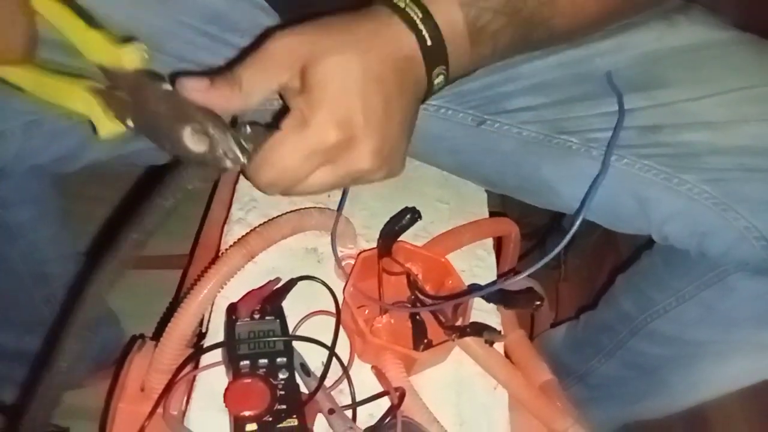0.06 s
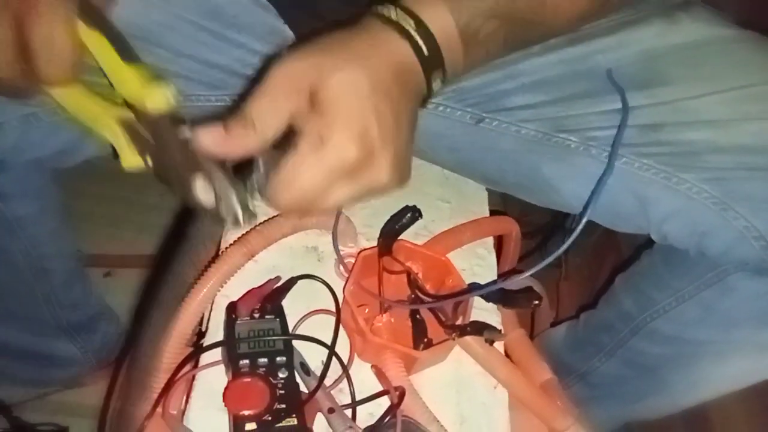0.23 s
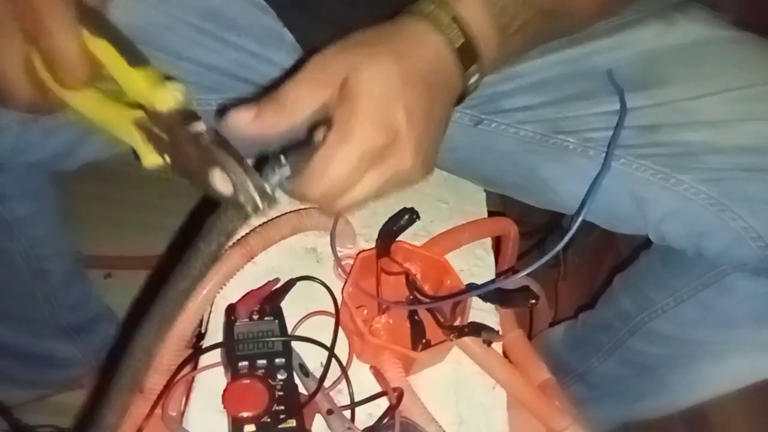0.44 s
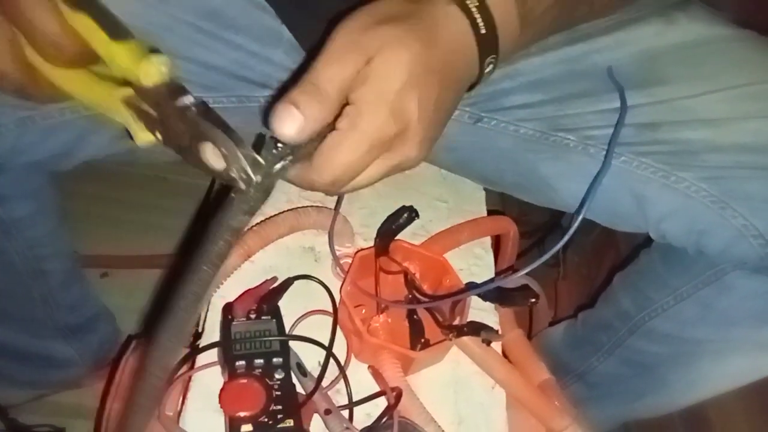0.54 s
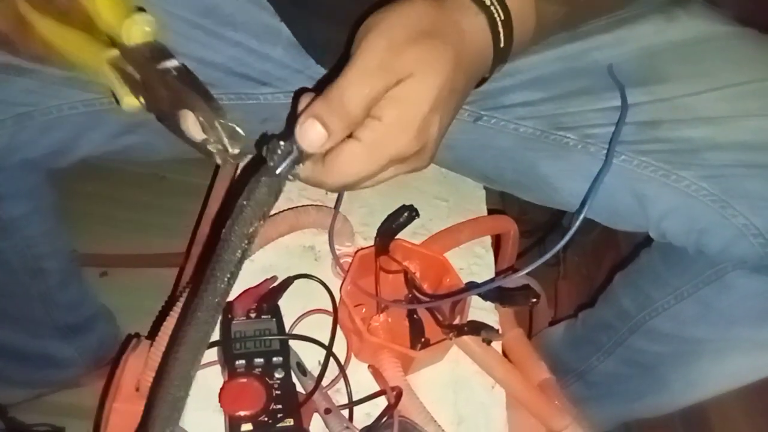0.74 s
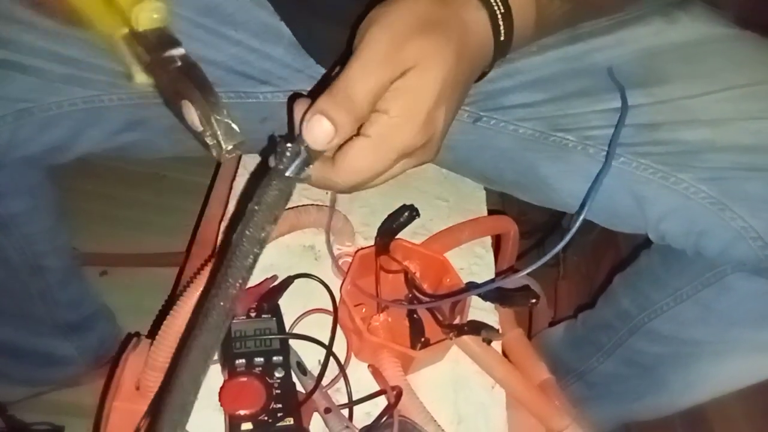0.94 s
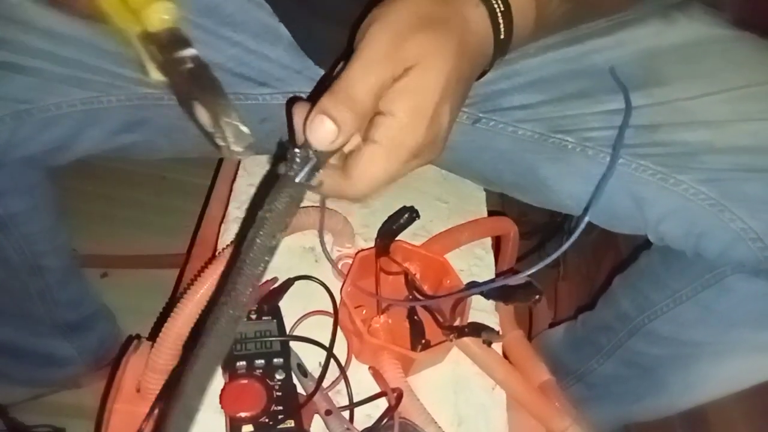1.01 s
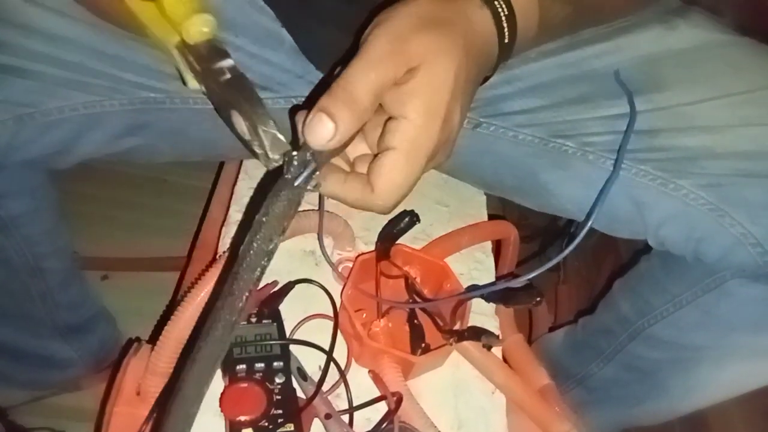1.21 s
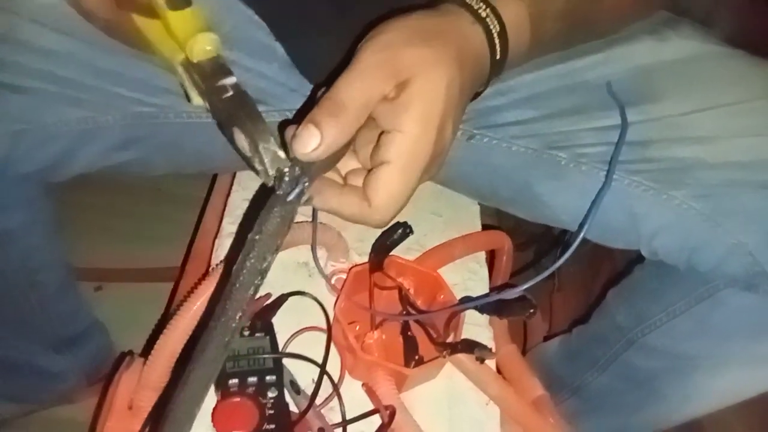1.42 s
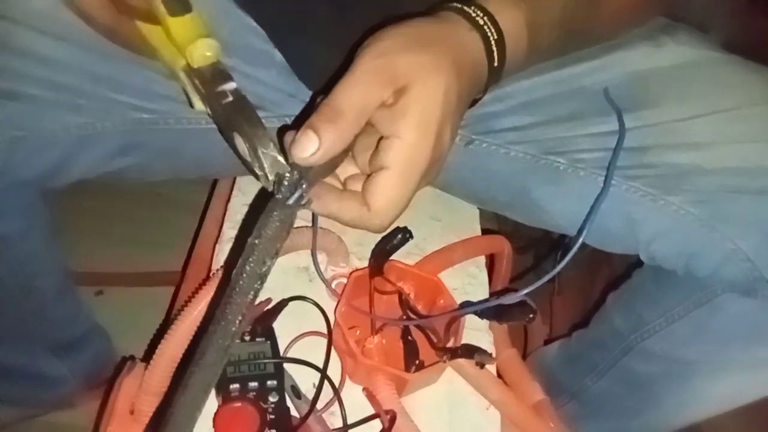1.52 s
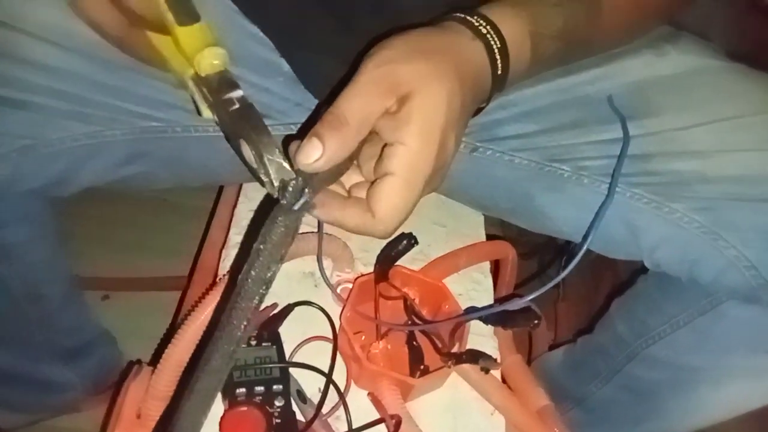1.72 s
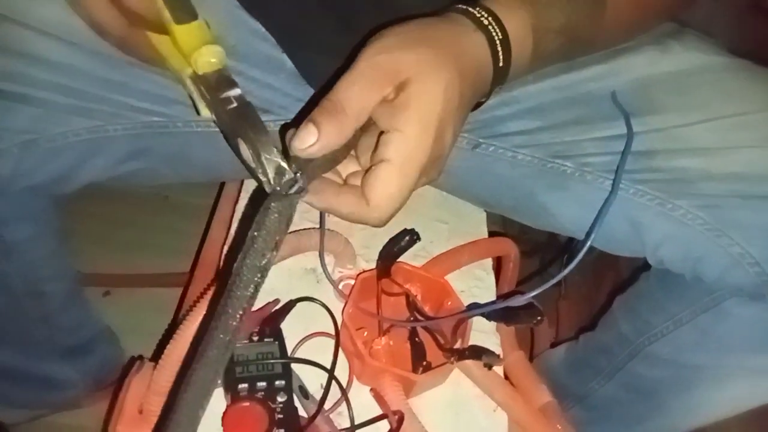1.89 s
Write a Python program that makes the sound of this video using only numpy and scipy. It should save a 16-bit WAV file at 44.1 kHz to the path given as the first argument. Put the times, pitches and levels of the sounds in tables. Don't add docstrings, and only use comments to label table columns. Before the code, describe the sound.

A single bright steel snap of pliers dominates early, echoing off nearby surfaces and hard walls; softer clicks, cable thuds and gritty rubbing trail after it, with faint low hum, heard close on a phone microphone.

```python
import sys
import numpy as np
from scipy import signal
from scipy.fft import rfft, irfft, next_fast_len
from scipy.io import wavfile
from scipy.ndimage import uniform_filter1d, map_coordinates

SR = 44100
rng = np.random.default_rng(int(sys.argv[2]) if len(sys.argv) > 2 else 0)


def invert_db(level):
    return 10 ** (np.asarray(level, dtype=float) / 20)


def pcm_store(signal):
    levels = np.round(np.clip(np.atleast_2d(signal), -1, 1) * 32767)
    wavfile.write(sys.argv[1], SR, levels.astype(np.int16).T)


N = 85995
SOUND_S = np.arange(N) / SR
BURST_S = np.arange(SR // 8) / SR


def unit(x):
    return x / np.sqrt(np.mean(x ** 2) + 1e-20)


def along(points, hz):
    f, v = np.transpose(points)
    return np.interp(np.log(hz + 1), np.log(f + 1), v)


def curve(rows):
    return np.interp(SOUND_S, *np.transpose(rows))


def wobble(knots_per_s):
    knots = rng.standard_normal(int(N * knots_per_s / SR) + 4)
    return map_coordinates(knots, [np.arange(N) * knots_per_s / SR])


def filtered(x, response):
    size = next_fast_len(len(x) + 8192)
    return irfft(rfft(x, size) * response(np.fft.rfftfreq(size, 1 / SR)), size)[:len(x)]


def body(peaks):
    def response(f):
        total = 0
        for k, (hz, width, db) in enumerate(peaks):
            total = total + (-1) ** k * invert_db(db) * 1j * f * width / (hz * hz - f * f + 1j * f * width)
        return total
    return response


def thrice(peak):
    near = body([peak])
    return lambda f: near(f) * near(f) * near(f)


def noise(spectrum):
    return unit(filtered(rng.standard_normal(N), lambda hz: invert_db(along(spectrum, hz))))


def add(track, start_s, sound):
    track[round(start_s * SR):][:len(sound)] += sound


SNAP_S, SNAP_DB = .2372, -7
JAW_RISE_S, CRACK_DB, CRACK_T60_S = 0.00029, -18, 0.04
SNAP_LOW_CUT_HZ = 700

# pitch_hz, level_db, t60_s
JAW_MODES = [(3462, 0, 0.022), (3653, 0.5, .016), (3820, -17.5, 0.048), (2896, -5.5, .02),
             (2199, -11.5, 0.03), (2470, -21, .03), (1856, -15, 0.045), (1213.4, -30, .02),
             (4430, -15.5, 0.035), (4843, -2, 0.0063), (5790, -4.5, 0.008), (7095, -10.5, 0.017),
             (11740, -25.5, .008)]
# delay_s, level_db, favoured_hz
NEAR_ECHOES = [(.0045, -7.5, 3900), (.0075, -7, 2500), (.0115, -18, 3600), (.015, -10.5, 2844),
               (.018, -6.5, 2200), (.0255, -24.5, 3500), (.029, -12, 2100), (.0325, -21, 3700)]


def snap():
    ring = np.zeros(len(BURST_S))
    for hz, db, t60 in JAW_MODES:
        ring += invert_db(db - 60 * BURST_S / t60) * np.sin(2 * np.pi * hz * BURST_S)
    ring *= 1 - np.exp(-(BURST_S / JAW_RISE_S) ** 2)
    crack = invert_db(CRACK_DB - 60 * BURST_S / CRACK_T60_S) * rng.standard_normal(len(BURST_S))
    blow = filtered(ring + crack, lambda f: (1j * f / (SNAP_LOW_CUT_HZ + 1j * f)) ** 2)
    direct, echoes = np.zeros(N), np.zeros(N)
    add(direct, SNAP_S, invert_db(SNAP_DB) * blow)
    for delay, db, hz in NEAR_ECHOES:
        scatter = rng.standard_normal(60) * np.exp(-np.arange(60) / 14)
        scatter /= np.linalg.norm(scatter)
        smeared = np.convolve(blow, scatter)[:len(BURST_S)]
        echo = filtered(smeared, body([(hz, .3 * hz, 0)]))
        add(echoes, SNAP_S + delay, invert_db(SNAP_DB + db) * echo)
    return direct + echoes


# freq_hz, level_db
ROOM_COLOUR_DB = [(400, -17), (1200, -12), (2200, -8), (3500, -5.5), (4400, -12.5), (5200, -14),
                  (7000, -6.5), (9000, -23), (14000, -24.5)]


def snap_tail():
    impulse = np.zeros(N)
    impulse[round(SNAP_S * SR)] = invert_db(15)
    wash = filtered(room(impulse), lambda f: invert_db(along(ROOM_COLOUR_DB, f)))
    return wash * (np.arange(N) > (SNAP_S + .002) * SR)


TICK_WIDE = .34
TICK_EDGE = 3

# start_s, level_db, pitch_hz, bright_db, t60_s
TICK_EVENTS = [(0.1948, -32, 3750, -27, 0.013), (0.197, -43, 2200, -25, 0.034),
               (.296, -49.5, 3200, 0, 0.011), (.3619, -32, 3530, -19, 0.028),
               (.447, -65.5, 10400, 4, 0.0086), (.476, -46, 3450, -1, 0.015),
               (0.527, -56.5, 2870, 8, 0.064), (.549, -41.5, 970, -12, 0.0095),
               (0.5566, -39, 2430, -4.5, 0.041), (.62, -63, 4030, 1.5, 0.15), (.66, -60, 4000, 8, 0.013),
               (.82, -50, 3520, -7, 0.055), (.824, -42.5, 1980, -21, 0.03), (.963, -67, 3600, -11, 0.017),
               (0.978, -48, 3760, -16, 0.0093), (0.9805, -39.5, 1750, -27, 0.035),
               (1.0267, -35, 3730, -41.5, 0.0067), (1.0264, -38.5, 2790, -6, 0.048),
               (1.0737, -40, 3170, -14, 0.035), (1.0748, -46, 1936, -20, 0.044),
               (1.0803, -45.5, 2510, -22, 0.021), (1.087, -47, 2840, -20, .02),
               (1.0955, -61, 2860, -12, 0.015), (1.598, -58.5, 1400, -30, 0.045),
               (1.809, -66.5, 3020, 3, 0.032)]
# centre_hz, width_hz, level_db
STEEL_BANDS = [(5624, 1600, -4), (7600, 860, 2.5), (10830, 4000, -20.5), (14370, 990, -12.5)]


def ticks():
    out = np.zeros(N + SR)
    for start, db, hz, bright_db, t60 in TICK_EVENTS:
        burst = invert_db(db - 60 * BURST_S / t60) * rng.standard_normal((2, len(BURST_S)))
        burst[:, 0] = TICK_EDGE * invert_db(db)
        sheath = filtered(burst[0], thrice((hz, TICK_WIDE * hz, 6))) / 2
        steel = filtered(burst[1], body(STEEL_BANDS))
        add(out, start, sheath + invert_db(bright_db) * steel)
    return out[:N]


KNOCK_WIDE = 1
KNOCK_OVER, KNOCK_OVER_DB = 2.9, -16.5
KNOCK_RISE_S = 0.0029
KNOCK_RING = .6

# start_s, level_db, pitch_hz, t60_s
KNOCK_EVENTS = [(.245, -41, 110, 0.077), (.282, -52, 157.6, 0.065), (.262, -38.5, 465, 0.068),
                (0.286, -38.5, 315.6, 0.047), (.617, -41, 196, 0.028), (.677, -44.5, 393, 0.086),
                (.804, -45.5, 842, 0.072), (.819, -33, 332.4, 0.054), (.8, -46, 261, 0.047),
                (.824, -46.5, 168.6, 0.078), (.822, -44, 434, 0.047), (.967, -53.5, 374.6, 0.23),
                (1.0255, -30.5, 610, 0.02), (1.032, -40, 766, 0.041), (1.074, -39.5, 754, 0.072),
                (1.082, -45.5, 441, 0.1), (1.294, -51.5, 390, 0.044), (1.596, -53, 622.4, 0.1)]


def knocks():
    out = np.zeros(N + SR)
    for start, db, hz, t60 in KNOCK_EVENTS:
        cable = body([(hz, KNOCK_WIDE * hz, 0), (KNOCK_OVER * hz, KNOCK_WIDE * hz, KNOCK_OVER_DB)])
        puff = filtered(rng.standard_normal(len(BURST_S)), cable)
        puff = unit(filtered(puff, cable))
        ring = np.sqrt(2) * np.sin(2 * np.pi * hz * BURST_S)
        blow = KNOCK_RING * ring + (1 - KNOCK_RING) * puff
        envelope = invert_db(db - 60 * BURST_S / t60) * (1 - np.exp(-BURST_S / KNOCK_RISE_S))
        add(out, start, 2 * envelope * blow)
    return out[:N]


GRAINS_PER_S, GRAIN_SPREAD_DB = 2500, 2.5
RUB_FLUTTER_DB = .8

# time_s, level_db
RUB_PRESSURE = [(0, -49.5), (.05, -54.5), (.12, -55), (.17, -60), (.65, -63), (.69, -56), (.77, -52),
                (.82, -56), (.9, -63), (.95, -64), (.98, -51), (1.0, -65), (1.03, -54), (1.068, -53.5),
                (1.078, -50.5), (1.1, -49.5), (1.125, -64.5), (1.35, -71.5), (1.6, -71.5), (1.95, -69)]
# centre_hz, width_hz, level_db
SHEATH_BANDS = [(625, 300, -1), (1339.4, 1680, 0.5), (2500, 1585, 0.5), (3558, 470, -1), (7000, 1500, -18),
                (12600, 4300, -30.5), (15000, 1200, -25.5)]


def rub():
    chance, size, side = rng.random((3, N))
    slip_size = invert_db(-GRAIN_SPREAD_DB * np.log(np.maximum(size, 1 / 20)))
    slips = (chance < GRAINS_PER_S / SR) * slip_size * np.sign(side - .5)
    drive = unit(slips) + 0.32 * rng.standard_normal(N)
    pressure = invert_db(curve(RUB_PRESSURE) + RUB_FLUTTER_DB * wobble(40))
    return unit(filtered(drive, body(SHEATH_BANDS))) * pressure


STROKE_RISE = .15
STROKE_GRIT_DB = 2.5

# start_s, length_s, pitch_hz, width_hz
STROKE_EVENTS = [(0, .13, 1830, 90), (0, .1, 650, 250), (.035, .11, 3600, 350), (.33, .22, 350, 250),
                 (.575, .06, 3950, 90), (.59, .07, 8150, 450), (.612, .03, 6300, 1500),
                 (.645, .05, 8550, 400), (.66, .27, 920, 110), (.672, .04, 1530, 90), (.69, .11, 3400, 800),
                 (.72, .05, 1820, 90), (.75, .075, 1545, 110), (1.028, .034, 1500, 2000),
                 (1.072, .065, 2200, 3200), (1.11, .2, 3200, 1300), (1.15, .16, 4450, 700),
                 (1.24, .05, 2370, 60), (1.59, .13, 1300, 1500), (1.585, .1, 620, 300),
                 (1.9, .3, 2600, 1600), (.53, .08, 7700, 600), (.36, .2, 560, 200), (.52, .16, 370, 200)]
STROKE_LEVELS = [-61.5, -56.5, -57, -54.5, -66, -71.5, -68, -76, -59, -58, -60.5, -63, -52, -49, -61, -63,
                 -77, -66, -63, -57, -64, -73, -56, -59]


def strokes():
    out = np.zeros(N + SR)
    for (start, length, hz, width), db in zip(STROKE_EVENTS, STROKE_LEVELS):
        hiss, grit = rng.standard_normal((2, SR // 2))
        progress = np.clip(np.arange(SR // 2) / SR / length, 0, 1)
        swell = np.sin(np.pi / 2 * np.interp(progress, [0, STROKE_RISE, 1], [0, 1, 0]))
        lumps = invert_db(STROKE_GRIT_DB * unit(uniform_filter1d(grit, size=200)))
        song = unit(filtered(hiss * lumps, thrice((hz, width, 0))))
        add(out, start, invert_db(db) * swell * song)
    return out[:N]


SHIFT_DB, SHIFT_LUMPS_DB = 4, 1.2

# time_s, level_db
SHIFT_LEVEL = [(0, -48), (.03, -46.5), (.06, -54.5), (.15, -53.5), (.22, -63), (.27, -53.5), (.33, -51.5),
               (.4, -51.5), (.52, -52.5), (.58, -58), (.63, -55.5), (.79, -65.5), (.83, -53.5),
               (.92, -63.5), (.98, -53.5), (1.35, -68.5), (1.84, -63.5), (1.95, -62.5)]
# freq_hz, density_db
SHIFT_SPECTRUM = [(25, -44), (60, -4), (100, 4.5), (200, -1.5), (400, -7), (700, -13), (1500, -27),
                  (3000, -92)]


def shifting():
    lumpy = noise(SHIFT_SPECTRUM) * invert_db(SHIFT_LUMPS_DB * wobble(35.39))
    return unit(lumpy) * invert_db(curve(SHIFT_LEVEL) + SHIFT_DB)


HUM_HZ, HUM_WIDE_HZ = 153, 12

# time_s, level_db
HUM_LEVEL = [(0, -43.5), (.1, -58), (.26, -57), (.3, -36), (.38, -58.5), (.51, -47), (.6, -60), (.9, -61.5),
             (1.2, -58.5), (1.5, -54.5), (1.8, -56), (1.95, -46)]
# time_s, level_db
RUMBLE_LEVEL = [(0, -58.5), (.86, -61.5), (.93, -71), (1.0, -63), (1.5, -57), (1.95, -60.5)]
# freq_hz, density_db
RUMBLE_SPECTRUM = [(15, -65), (25, -34), (65, -6), (124, -10.5), (145, -8), (175, 0), (192, -27),
                   (221, -0.5), (330, -32.5), (430, -52.5), (730, -120)]


def fan():
    tone = 3 * np.sin(2 * np.pi * HUM_HZ * SOUND_S + .8 * wobble(10))
    fuzz = unit(filtered(rng.standard_normal(N), body([(HUM_HZ, HUM_WIDE_HZ, 0)])))
    hum = unit(tone + fuzz) * invert_db(curve(HUM_LEVEL))
    rumble = invert_db(curve(RUMBLE_LEVEL) + wobble(7.1)) * noise(RUMBLE_SPECTRUM)
    return hum + rumble


# freq_hz, density_db
AIR_SPECTRUM = [(250, -26), (330, -9.5), (420, -5), (1060, -5), (2390, -1.5), (3900, -10), (5200, -37),
                (7500, -38), (9000, -35), (15800, -31)]


def room_air():
    return noise(AIR_SPECTRUM) * invert_db(-68.5 + 0.64 * wobble(1.8))


ROOM_DELAY_S, SMALL_ROOM_DB, KNOCK_ROOM_DB = .005, -13.5, -8

# freq_hz, t60_s
ROOM_T60 = [(300, 0.11), (1000, 0.56), (3000, 0.73), (7000, 0.29), (14000, 0.38)]


def room(x):
    hz, t, z = signal.stft(rng.standard_normal(SR * 3 // 4), SR, nperseg=256)
    decay = invert_db(-60 * t / along(ROOM_T60, hz)[:, None])
    tail = signal.istft(z * decay, SR, nperseg=256)[1]
    delayed = np.pad(x, (round(ROOM_DELAY_S * SR), 0))
    return signal.fftconvolve(delayed, tail / np.linalg.norm(tail))[:N]


def scene():
    tick, knock = ticks(), knocks()
    answer = invert_db(SMALL_ROOM_DB) * room(tick + invert_db(KNOCK_ROOM_DB) * knock)
    near = snap() + tick + knock + rub() + strokes()
    behind = snap_tail() + answer + shifting() + fan() + room_air()
    return (near + behind)[None]


def band_limit(x):
    return signal.sosfilt(signal.butter(12, 16840, fs=SR, output="sos"), x)


PORT_DIP_HZ, PORT_DIP_WIDE_HZ, PORT_DIP = 5200, 700, .4
TOP_HZ, ABOVE_TOP_DB, END_HZ = 15600, -22, 16800


def record(dry):
    dip = body([(PORT_DIP_HZ, PORT_DIP_WIDE_HZ, 0)])

    def microphone(hz):
        limit = np.where(hz < TOP_HZ, 1, invert_db(ABOVE_TOP_DB) * (hz < END_HZ))
        return (1 - PORT_DIP * dip(hz)) * limit

    mix = filtered(dry[0], microphone)[None]
    return band_limit(mix)


dry = scene()
out = record(dry)
pcm_store(out)
```